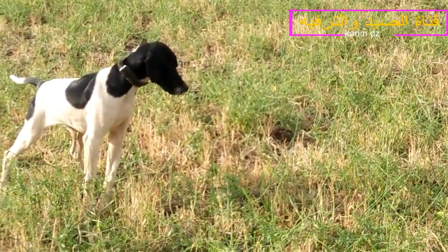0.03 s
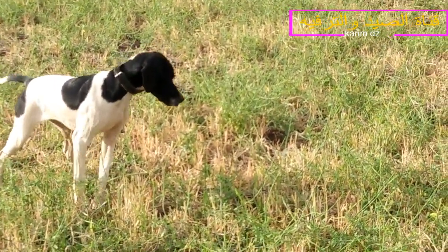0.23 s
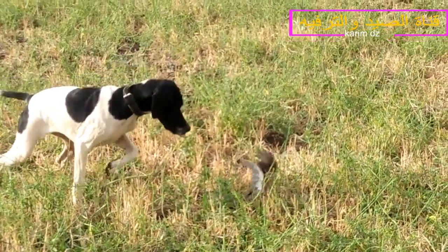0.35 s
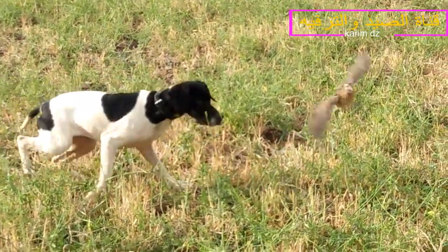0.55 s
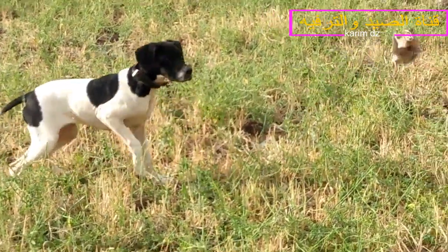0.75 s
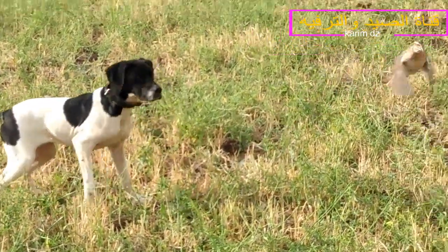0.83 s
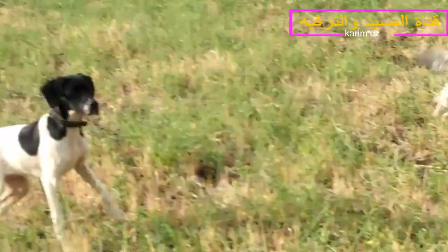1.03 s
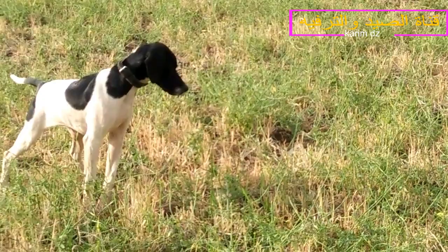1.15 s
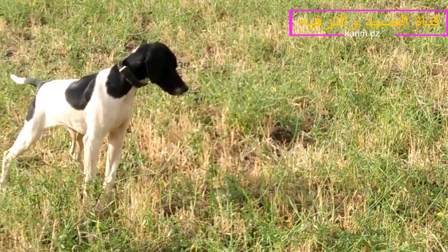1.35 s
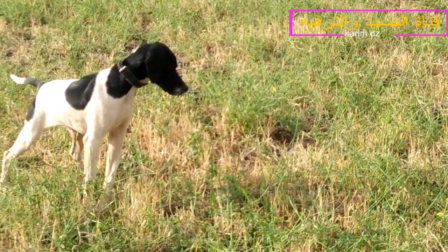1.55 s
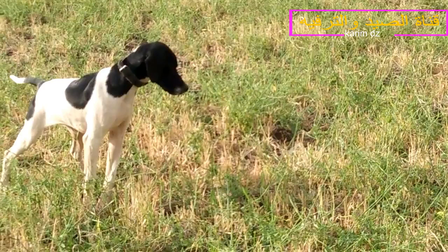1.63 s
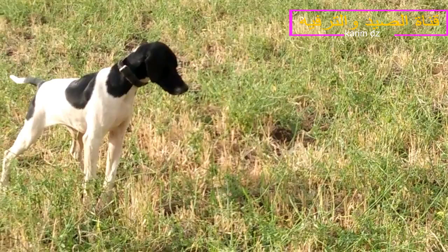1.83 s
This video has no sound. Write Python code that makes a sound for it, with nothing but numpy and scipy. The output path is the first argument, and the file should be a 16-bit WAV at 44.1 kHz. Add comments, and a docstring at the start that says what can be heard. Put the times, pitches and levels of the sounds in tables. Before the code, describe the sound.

Rapid wingbeats rush from crackling grass as a bird takes off outdoors, with a brief warbling chirp and low rumble on the microphone. The flurry cuts off, and a faint buzz and a quick run of soft thumps follow.

```python
"""An open field: a game bird bursts out of dry grass. Stems snap, stalks and feathers rustle,
the wings whirr stroke by stroke over a hollow tone, and the bird gives one warbling chirp.
Low buffets shake the microphone during the flush. The rustle stops abruptly,
leaving a low buzz and a quick run of soft, dull thumps over a faint fluttering hiss."""
import sys
import numpy as np
from scipy import signal
from scipy.fft import rfft, irfft, next_fast_len
from scipy.io import wavfile
from scipy.ndimage import map_coordinates

SR = 44100
rng = np.random.default_rng(int(sys.argv[2]) if len(sys.argv) > 2 else 0)


def transcribe(signal):
    """Save signal, clipped to [-1, 1], as a 16-bit WAV file at the path in sys.argv[1]."""
    frames = np.atleast_2d(signal).T
    limited = np.clip(frames, -1, 1)
    pcm = np.round(limited * 32767).astype(np.int16)
    wavfile.write(sys.argv[1], SR, pcm)


N = 83790
T = np.arange(N) / SR
FLUSH_START_S, FLUSH_END_S, EDGE_S = .512, 1.081, .001


def amp(db):
    """Decibels to gain."""
    return 10 ** (np.asarray(db) / 20)


def unit(x):
    """Scale to rms 1."""
    return x / np.sqrt(np.mean(x ** 2) + 1e-20)


def along(points, hz):
    """Read a curve of (freq_hz, value) points on a log frequency axis."""
    freqs, values = np.transpose(points)
    return np.interp(np.log(hz + 1), np.log(freqs + 1), values)


def curves(rows):
    """One automation curve for each column after the time."""
    times, *columns = np.transpose(rows)
    return [np.interp(T, times, column) for column in columns]


def wobble(rate):
    """A smooth random curve, rate knots a second."""
    return map_coordinates(rng.standard_normal(int(N * rate / SR) + 4), [T * rate])


def bell(peak_s, width_s):
    """A Gaussian swell."""
    return np.exp(-.5 * ((T - peak_s) / width_s) ** 2)


def gate(start_s, end_s):
    """Open between start and end, with short ramps."""
    return np.clip((T - start_s) / EDGE_S, 0, 1) * np.clip((end_s - T) / EDGE_S, 0, 1)


def push(peak_s, db, hz, cycles):
    """One dull pressure bump: a low tone under a swell whose width is given in cycles."""
    return -amp(db) * bell(peak_s, cycles / hz) * np.cos(2 * np.pi * hz * (T - peak_s))


def filtered(x, response):
    """Shape x with a frequency response."""
    size = next_fast_len(N + SR // 2)
    return irfft(rfft(x, size) * response(np.fft.rfftfreq(size, 1 / SR)), size)[..., :N]


# Stereo image of the noise layers: freq_hz, left_right_correlation
STEREO_IMAGE = [(4000, .9999), (5200, 1), (6500, .75), (9000, 0.3), (12000, 0.56)]

def coloured(pair, eq):
    """EQ two unrelated signals into stereo of rms 1: mono in the bass, wider in the treble."""
    def response(hz):
        spread = np.arccos(along(STEREO_IMAGE, hz)) / 2 * (hz > STEREO_IMAGE[0][0])
        skirts = np.minimum(1, np.minimum(hz / eq[0][0], eq[-1][0] / (hz + 1))) ** 4
        return amp(along(eq, hz)) * skirts * [np.cos(spread), np.sin(spread)]
    mid, side = filtered(pair, response)
    return unit(np.array([mid + side, mid - side]))


def noise(eq):
    """Stereo noise of rms 1, coloured by an EQ curve."""
    return coloured(rng.standard_normal((2, N)), eq)


# Tone of the open air: freq_hz, gain_db
AIR_EQ = [(250, -2), (310, -1), (360, -17.5), (440, -8), (520, -19.5), (580, -5.5), (680, -13.5),
          (800, -9.5), (1080, -9), (1250, -3.5), (1420, -7.5), (1750, -13.5), (2200, -18), (2800, -21.5),
          (5200, -25), (6000, -25.5), (6700, -27), (7800, -27.5), (15000, -33)]

def air():
    """A faint bed of air; after the flush the hiss turns into a fast, buzzy flutter."""
    comb_hz, feedback, depth_db = 28.79, .8, 1.8
    comb = lambda hz: 1 / (1 - feedback * np.exp(-2j * np.pi * hz / comb_hz))
    tremolo = amp(depth_db * np.sin(2 * np.pi * (2 * comb_hz) * T))
    flutter = unit(filtered(noise(AIR_EQ), comb)) * tremolo
    return np.where(T < FLUSH_END_S, amp(-74.5) * noise(AIR_EQ), amp(-75) * flutter)


# Levels of the buzz's two partials: time_s, fundamental_db, octave_db
BUZZ_LEVELS = [(1.04, -75, -80), (1.085, -53, -63), (1.16, -54, -62), (1.19, -58, -60), (1.4, -58, -60),
               (1.6, -65, -64), (1.78, -67, -61), (1.9, -66, -59)]
# Drift of the buzz: time_s, pitch_hz
BUZZ_DRIFT = [(1.08, 57), (1.2, 52.5), (1.3, 55.6), (1.36, 57.16), (1.9, 56.2)]

def buzz():
    """A low tone and its octave fade in quickly as the flush ends."""
    pitch, = curves(BUZZ_DRIFT)
    fundamental_db, octave_db = curves(BUZZ_LEVELS)
    phase = 2 * np.pi * np.cumsum(pitch) / SR
    fade_in = np.clip((T - BUZZ_LEVELS[0][0]) / .024, 0, 1)
    partials = amp(fundamental_db) * np.cos(phase) + amp(octave_db) * np.cos(2 * phase)
    return np.sqrt(2) * partials * fade_in


# Soft, dull hits: peak_s, body_db
THUMP_HITS = [(0.049, -44), (0.088, -50), (0.166, -71), (1.4192, -43), (1.453, -43.5), (1.4865, -42.5),
              (1.52, -42), (1.5526, -42), (1.578, -43.5), (1.6125, -43), (1.637, -42.5), (1.668, -43),
              (1.702, -43.5), (1.735, -44.5), (1.769, -45.5), (1.801, -55), (1.831, -50.5), (1.866, -54),
              (1.896, -53)]

def thumps():
    """A low body with a faint knock on top: three at the start, later a run of some thirty a second."""
    return sum(push(s, db, hz=142.6, cycles=.6) + push(s, db - 19, hz=289.6, cycles=1.12)
               for s, db in THUMP_HITS)


# Swells of the rumble: time_s, level_db
RUMBLE_SWELLS = [(0, -51.5), (.09, -62.5), (.12, -68), (.2, -60), (.228, -51.5), (.26, -45), (.32, -42),
                 (.375, -53), (.425, -50.5), (.46, -38), (.54, -44.5), (.6, -38), (.648, -48), (.7, -40),
                 (.77, -47), (.87, -52), (.955, -52.5), (.985, -62.5), (1.03, -60), (1.1, -69.5),
                 (1.9, -72)]
# Low end of the rumble: freq_hz, gain_db
RUMBLE_EQ = [(15, -17.5), (32, -14.5), (58, 4.5), (90, -2.5), (125, -4), (180, -12.5), (240, -25.5),
             (310, -48), (400, -53.5), (700, -71)]
# Its scuffing top: freq_hz, gain_db
SCUFF_EQ = [(170, -6.5), (220, -4.5), (300, 5), (370, -17), (460, -14), (600, -22)]
# Single buffets: peak_s, level_db, pitch_hz
BUFFET_HITS = [(.23, -41.5, 135), (.271, -50, 146), (0.293, -29, 81.5), (0.338, -35.5, 95.6),
               (0.402, -42.5, 144), (0.45, -30.5, 124.4), (.483, -30.5, 155.5), (0.514, -29.5, 117),
               (0.569, -34.5, 112), (0.584, -34.5, 94), (0.673, -32, 104), (0.703, -31.5, 102),
               (.733, -34, 107.4), (0.808, -37, 93)]

def rumble():
    """Uneven low rumble, brighter when strong, with single buffets on the microphone."""
    level_db, = curves(RUMBLE_SWELLS)
    loud_db, scuff_db_per_db = -44, 1.52
    scuff = amp(-64 + scuff_db_per_db * (level_db - loud_db)) * noise(SCUFF_EQ)
    buffets = sum(push(s, db, hz, cycles=.52) for s, db, hz in BUFFET_HITS)
    return amp(level_db) * noise(RUMBLE_EQ) + scuff + buffets


# Hollow tone under the whirr: time_s, pitch_hz, level_db
HOLLOW_TONE = [(.1, 860, -88), (.3, 770, -84.5), (.37, 750, -75), (.5, 750, -80), (.62, 755, -70.5),
               (.79, 756, -70.5), (.86, 800, -66), (.94, 790, -71), (.98, 755, -61), (1.0, 733, -64.5),
               (1.05, 725.6, -59.5), (1.08, 725, -67)]

def hollow():
    """A wavering hollow tone that grows louder and sinks a little in pitch as the bird gets away."""
    pitch, level_db = curves(HOLLOW_TONE)
    jitter, flicker_db = .03, 2
    phase = 2 * np.pi * np.cumsum(pitch * (1 + jitter * wobble(120))) / SR
    return np.sqrt(2) * np.sin(phase) * amp(level_db + flicker_db * wobble(60)) * gate(0, FLUSH_END_S)


# Tiny whistles: peak_s, pitch_hz, level_db
PEEP_NOTES = [(.35, 3180, -79), (.891, 6350, -69), (0.932, 4370, -63), (.98, 2770, -67), (.997, 3300, -68)]

def peeps():
    """Faint sine blips before, during and after the chirp."""
    return sum(np.sqrt(2) * amp(db) * bell(s, width_s=.0036) * np.sin(2 * np.pi * hz * T)
               for s, hz, db in PEEP_NOTES)


# Swells of the bright rustle: time_s, level_db
RUSTLE_SWELLS = [(.512, -62.5), (.535, -65.5), (.548, -65.5), (.577, -66.5), (.597, -69.5), (.626, -57.5),
                 (.643, -66), (.66, -57.5), (.695, -65), (.76, -60.5), (.785, -62.5), (.9, -60.5),
                 (.985, -60.5), (1.08, -63)]
# Fizz of grass and feathers: freq_hz, gain_db
RUSTLE_EQ = [(3400, -35), (5800, -18), (6500, -12), (7000, -7.5), (8050, -0.5), (8800, 3), (9600, -0.5),
             (10700, 0), (11900, -10), (13700, -13.5), (14300, -14)]
# Dry crackle: freq_hz, gain_db
CRACKLE_EQ = [(1200, -3), (2100, 1), (2800, -25), (4400, -1.5), (6000, -9), (8500, -6), (11000, -13),
              (14000, -9)]
# Straw body, under the rustle and the snaps: freq_hz, gain_db
STRAW_EQ = [(300, -28), (520, -0.5), (760, 4), (1000, 1.5), (1400, -4.5), (2250, -6.5), (2700, -20.5),
            (3600, -13.5), (4100, -15.5), (4800, -4.5), (5900, -24.5), (8000, -49)]

def grass():
    """Dense tiny ticks of stalks and feathers over their hiss, sparser crackles and a dull straw body."""
    def ticks(per_s, spread_db=2):
        hits = rng.random((2, N)) < per_s / SR
        return hits * rng.standard_normal((2, N)) * amp(spread_db * rng.standard_normal((2, N)))
    level_db, = curves(RUSTLE_SWELLS)
    grain_share = .4  # of the fizz's power
    grains = coloured(ticks(per_s=1100), RUSTLE_EQ)
    fizz = np.sqrt(grain_share) * grains + np.sqrt(1 - grain_share) * noise(RUSTLE_EQ)
    crackle = amp(-75.5) * coloured(ticks(per_s=220), CRACKLE_EQ)
    rustle = amp(level_db + .36 * wobble(70.8)) * fizz
    straw = amp(-65 + 2.3 * wobble(79.6)) * noise(STRAW_EQ)
    return rustle + crackle + straw


# Brushes through the grass: peak_s, width_s, centre_hz, level_db
GRASS_SWISHES = [(0.528, 0.0066, 980, -62), (0.532, .012, 2170, -65), (0.71, 0.02, 1026, -65),
                 (0.73, 0.028, 5040, -72), (0.908, .02, 5060, -72.5), (0.993, 0.033, 3990, -69),
                 (1.008, 0.047, 2980, -73)]

def swishes():
    """Brief brushing sounds, each a swell of noise in its own narrow band."""
    def band(centre_hz, q=6.5):
        response = lambda hz: 1 / (1 + (q * (hz / centre_hz - centre_hz / (hz + 1))) ** 2)
        return unit(filtered(rng.standard_normal(N), response))
    return sum(amp(db) * bell(s, width_s) * band(hz) for s, width_s, hz, db in GRASS_SWISHES)


# Stems snapping and whipping: peak_s, level_db, rise_s, t60_s, body_relative_db
STEM_SNAPS = [(.523, -41, 0.00028, 0.0047, -14), (0.5264, -55.5, 0.0006, 0.035, 1.5),
              (0.5347, -52, 0.003, 0.031, -12), (0.575, -54.5, 0.0011, 0.04, -7),
              (0.5868, -46, 0.002, 0.0099, -6), (0.671, -56, 0.00058, 0.0083, 8)]
# Bright crack of a stem: freq_hz, gain_db
CRACK_EQ = [(3000, -49), (4000, -4), (4800, -5.5), (6000, -17), (7000, -15), (8000, 3), (8800, 5),
            (9600, -1), (10700, 3), (12500, -19), (13800, -9), (14300, -30)]

def snaps():
    """Dry stems bend and crack straight ahead as the bird breaks through them."""
    wide, body, out = noise(CRACK_EQ), noise(STRAW_EQ), np.zeros((2, N))
    mid = wide.mean(axis=0)
    crack = unit(mid) + .22 * (wide - mid)  # narrowed towards the centre
    for s, db, rise_s, t60_s, body_db in STEM_SNAPS:
        envelope = np.where(T < s, bell(s, rise_s), amp(-60 * np.abs(T - s) / t60_s))
        out += amp(db) * envelope * (crack + amp(body_db) * body)
    return out


# Wing strokes: peak_s, whoosh_db, slap_db
WING_STROKES = [(0.526, -59.5, -75), (.553, -74, -79), (.578, -71, -61), (0.616, -77, -69),
                (0.659, -58.5, -54.5), (0.672, -60, -57), (0.72, -65, -66), (.755, -73, -65),
                (0.796, -58, -73), (0.828, -56.5, -63.5), (.862, -55.5, -70), (0.895, -57, -72),
                (0.93, -58.5, -61), (0.952, -56, -72), (0.976, -59.5, -69.5), (0.991, -58, -65.5),
                (1.019, -61, -64), (1.035, -65, -62.5), (1.068, -73, -64.5)]
# Whoosh of a wing: freq_hz, gain_db
WHOOSH_EQ = [(400, -18), (540, -23), (600, 4.5), (660, -4.5), (740, 1.5), (830, 1), (930, -12), (1050, -33),
             (1300, -28)]
# Slap of its feathers: freq_hz, gain_db
SLAP_EQ = [(700, -48), (1100, 0), (1380, 6.5), (1700, 2.5), (2200, -6), (2700, -27), (4500, -10.5),
           (6500, -19)]

def wings():
    """Each stroke gives a hollow whoosh and a brighter slap of feathers."""
    width_s = .0045
    whoosh = sum(amp(db) * bell(s, width_s) for s, db, _ in WING_STROKES)
    slap = sum(amp(db) * bell(s, width_s) for s, _, db in WING_STROKES)
    return whoosh * noise(WHOOSH_EQ) + slap * noise(SLAP_EQ)


# Warble of the bird's call: time_s, pitch_hz
CHIRP_WARBLE = [(.793, 3245.5), (.806, 3270), (.817, 2846), (.826, 2783), (.833, 3138), (.843, 3420),
                (.85, 3146), (.857, 2859), (.872, 2843), (.886, 3277), (.897, 3151), (.909, 2794),
                (.917, 2836), (.93, 3123), (.945, 3260)]
# Pulses of the call: time_s, level_db
CHIRP_PULSES = [(0.789, -78), (0.8, -50), (0.811, -56.5), (0.817, -50), (.826, -56), (0.835, -53.5),
                (0.845, -40.5), (0.857, -54), (0.862, -67), (0.864, -48.5), (.872, -52), (0.879, -92),
                (0.888, -49), (.902, -57.5), (0.912, -54.5), (0.925, -81.5), (.934, -53.5), (.941, -60.5),
                (.95, -72)]

def chirp():
    """The bird's slightly rough, warbling whistle, brighter when loud."""
    pitch, = curves(CHIRP_WARBLE)
    level_db, = curves(CHIRP_PULSES)
    jitter, flicker_db = .018, 2
    loud_db, overtone_db_per_db = -40, 1.6
    phase = 2 * np.pi * np.cumsum(pitch * (1 + jitter * wobble(600))) / SR
    overtone = amp(-16.5 + overtone_db_per_db * (level_db - loud_db))
    voice = np.sqrt(2) * (np.sin(phase) + overtone * np.sin(2 * phase))
    envelope = amp(level_db + flicker_db * wobble(400)) * gate(CHIRP_PULSES[0][0], CHIRP_PULSES[-1][0])
    return voice * envelope


def over_field(voice):
    """A call with its reflection off the ground and a short tail scattered over the field."""
    ground_delay_s, t60_s = .009, .3
    bounce = np.interp(T - ground_delay_s, T, voice)
    tail = rng.standard_normal(N) * amp(-60 * T / t60_s)
    scatter = signal.fftconvolve(voice, tail / np.linalg.norm(tail))[:N]
    return voice + amp(-19) * bounce + amp(-22) * scatter


def scene():
    """The flush, gated hard, over the faint tones, the low end and the air of the field."""
    flush = grass() + swishes() + snaps() + wings() + over_field(chirp())
    flush *= gate(FLUSH_START_S, FLUSH_END_S)
    return flush + hollow() + peeps() + rumble() + thumps() + buzz() + air()


def record(dry):
    """A brick-wall high cut on the mix."""
    return filtered(dry, lambda hz: hz < 14350)


dry = scene()
out = record(dry)
transcribe(out)
```